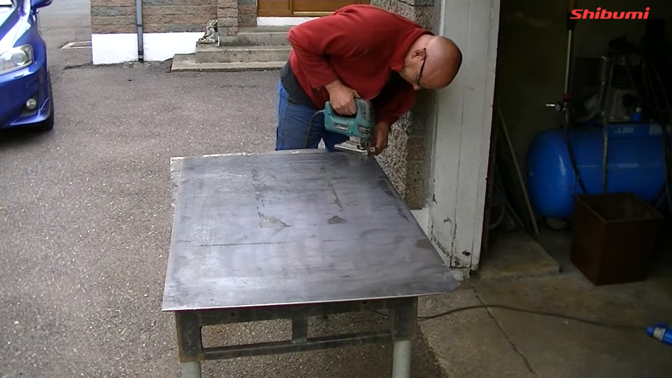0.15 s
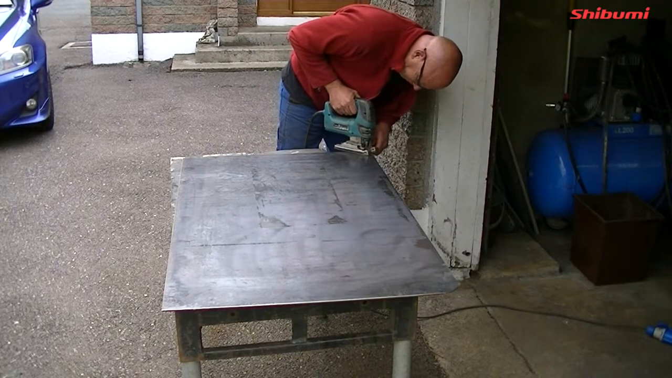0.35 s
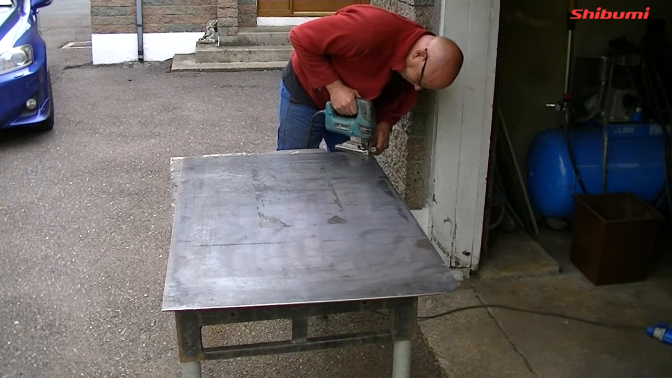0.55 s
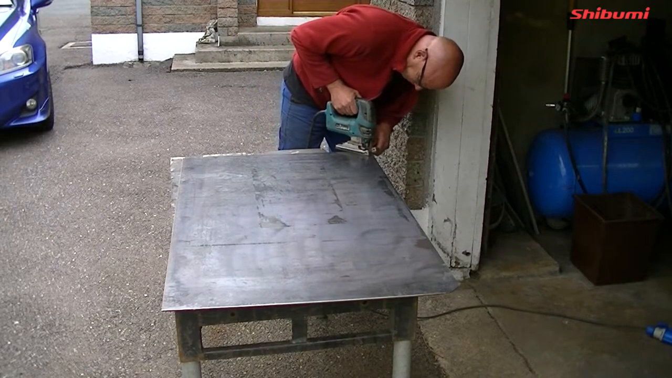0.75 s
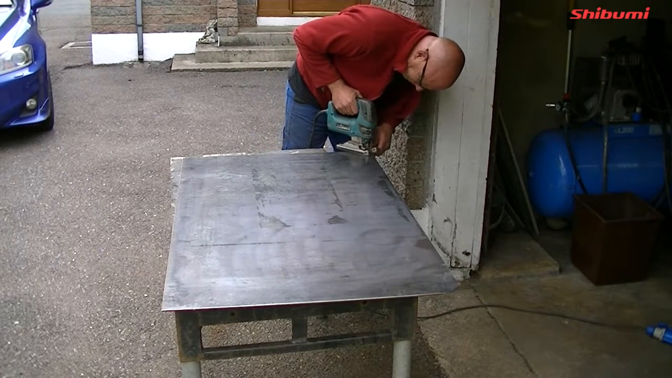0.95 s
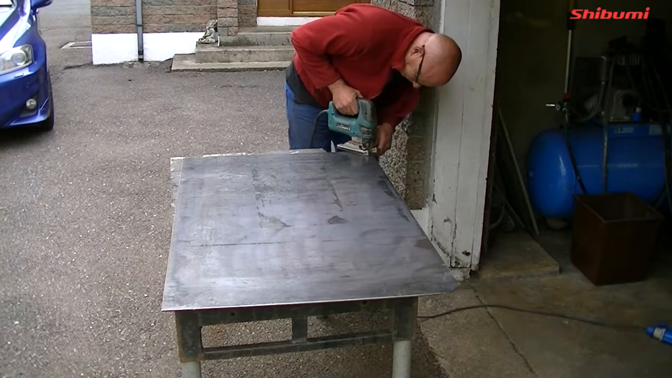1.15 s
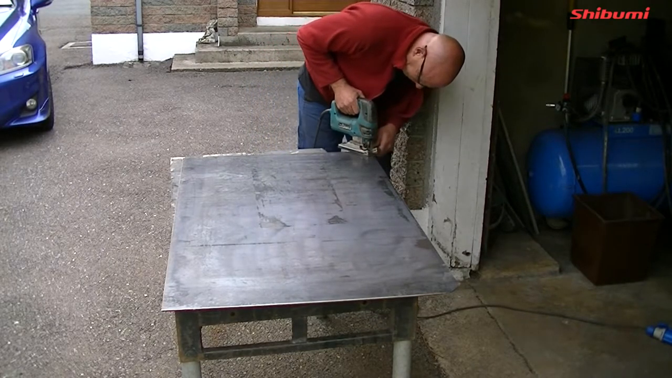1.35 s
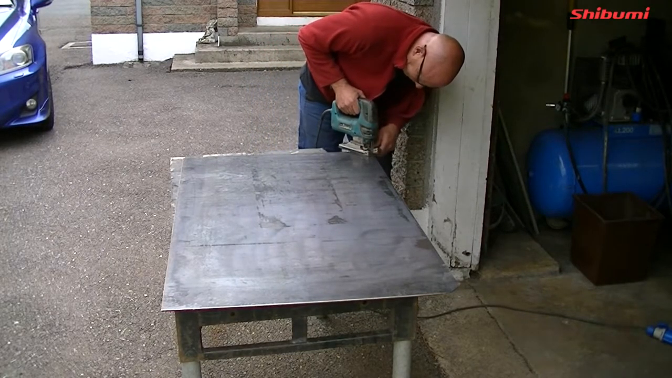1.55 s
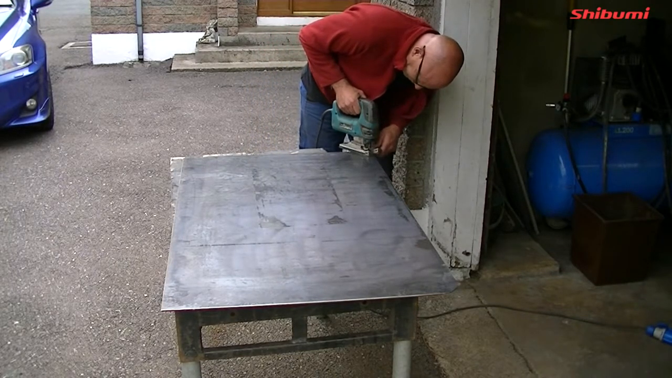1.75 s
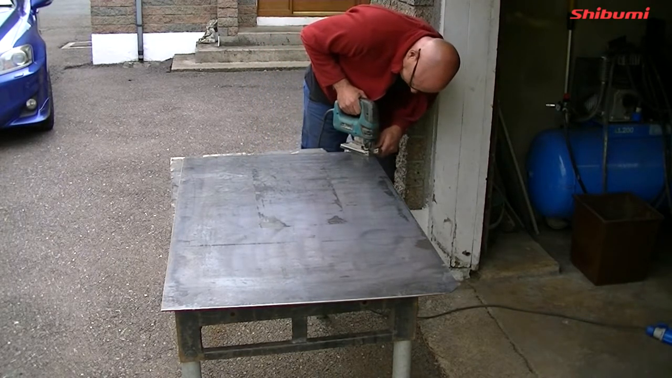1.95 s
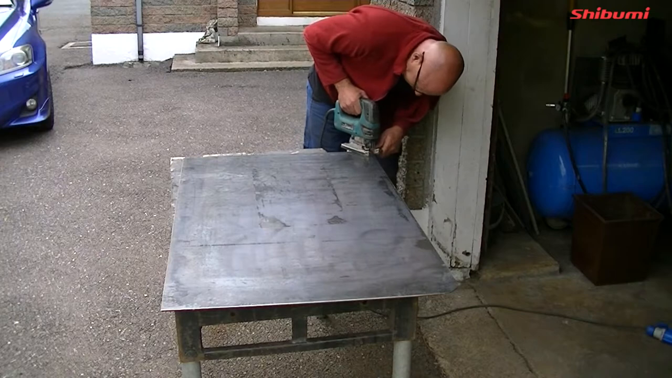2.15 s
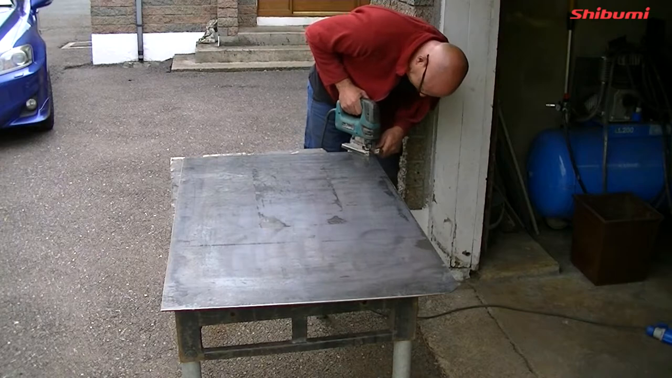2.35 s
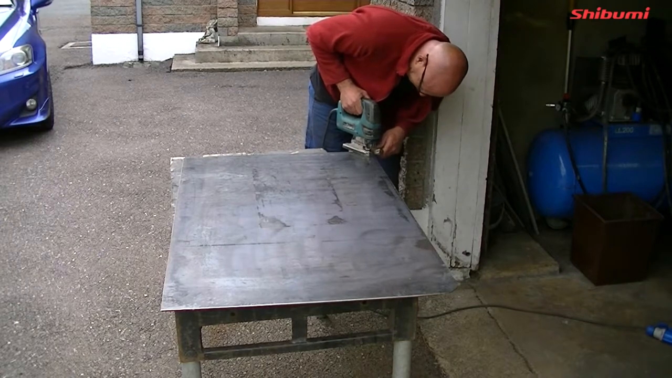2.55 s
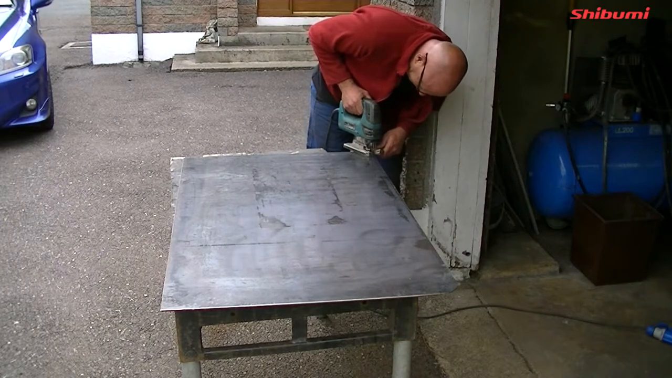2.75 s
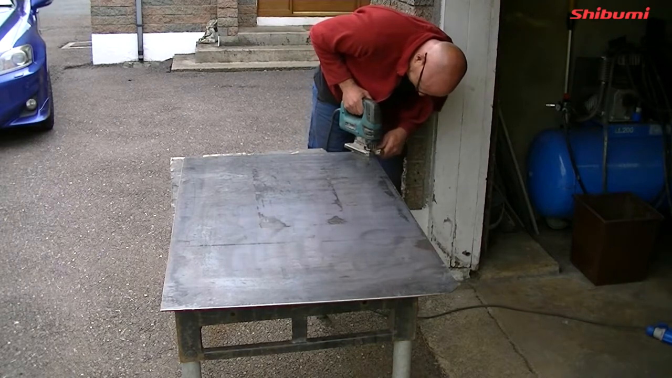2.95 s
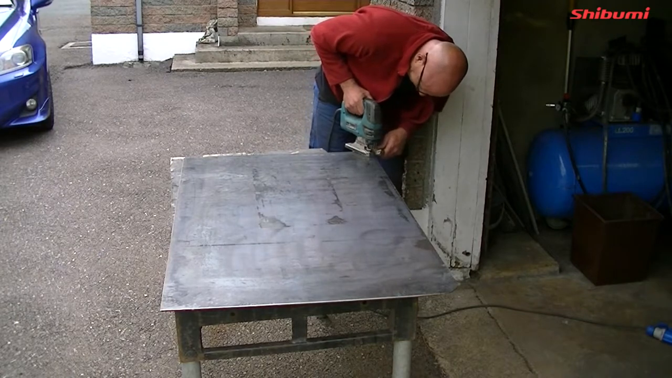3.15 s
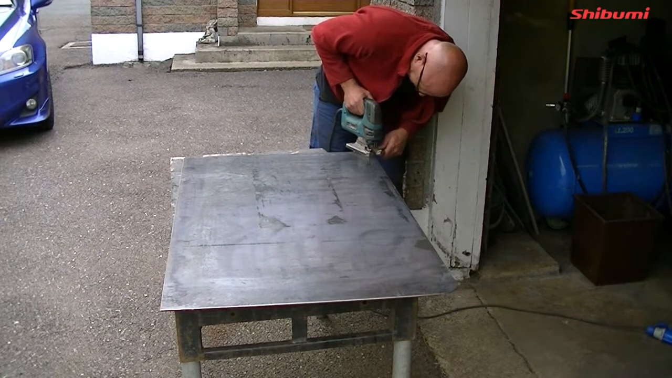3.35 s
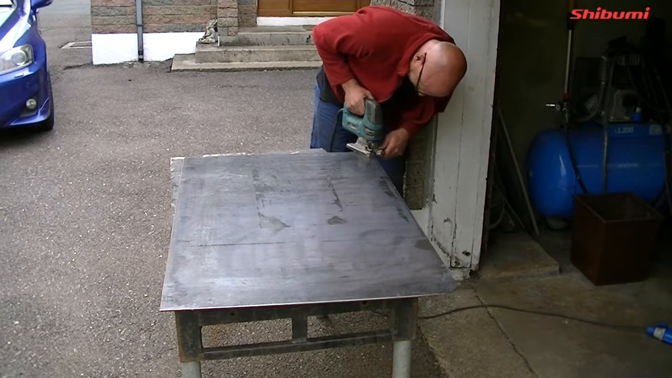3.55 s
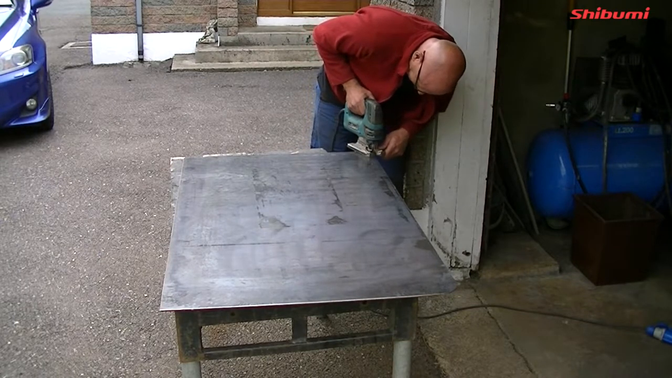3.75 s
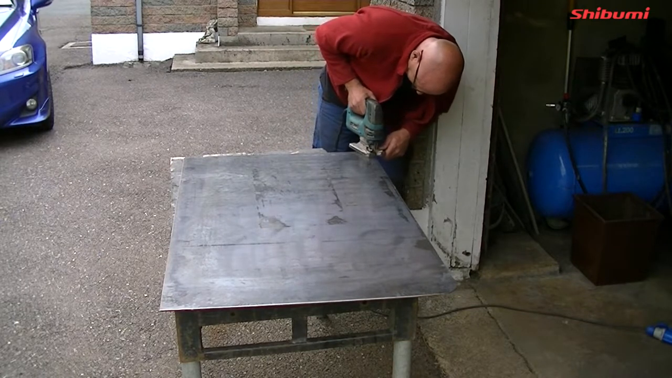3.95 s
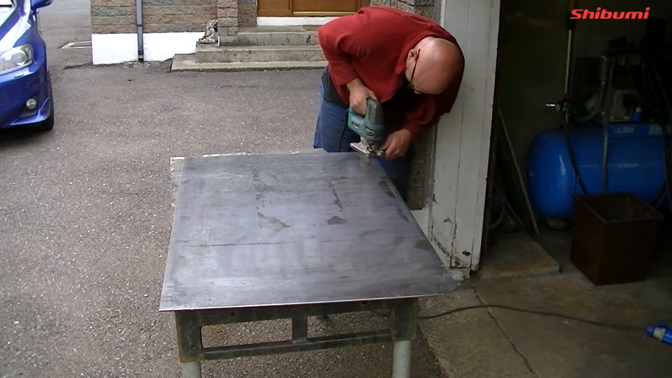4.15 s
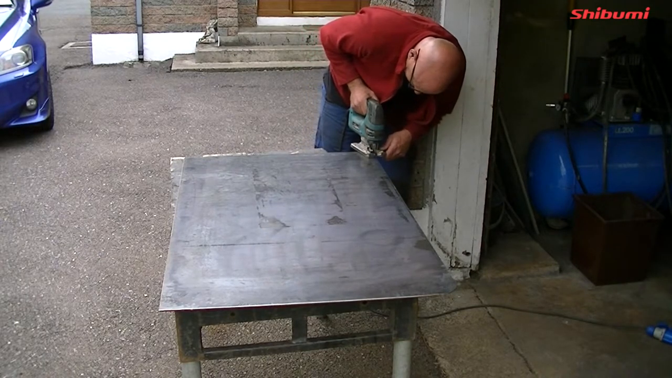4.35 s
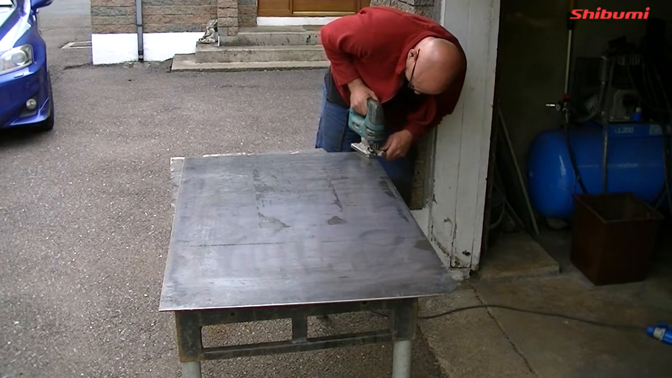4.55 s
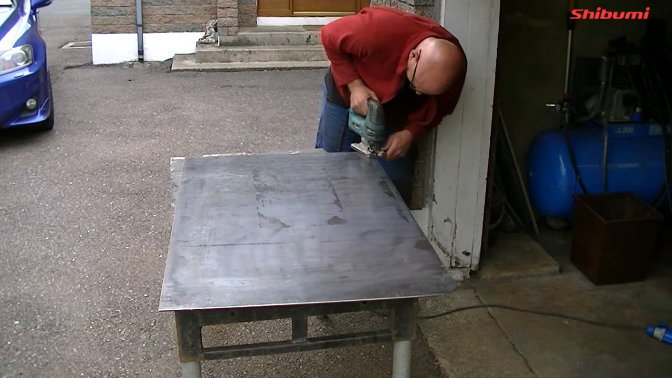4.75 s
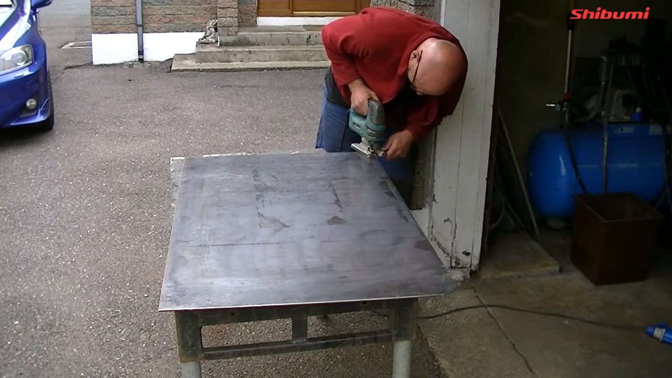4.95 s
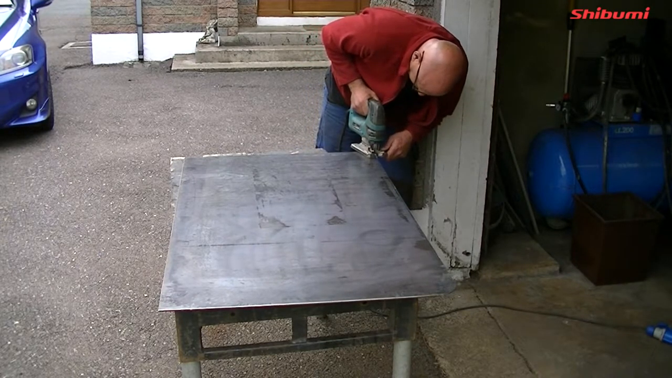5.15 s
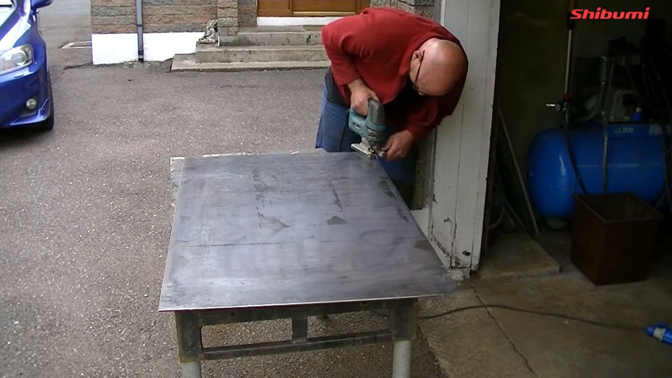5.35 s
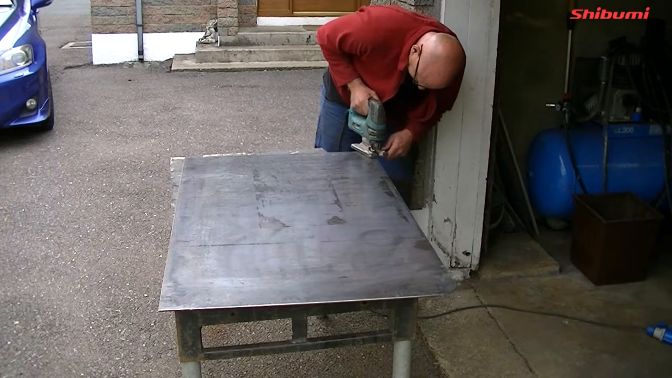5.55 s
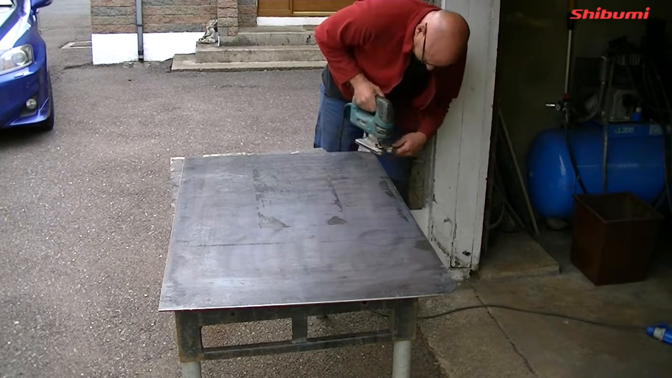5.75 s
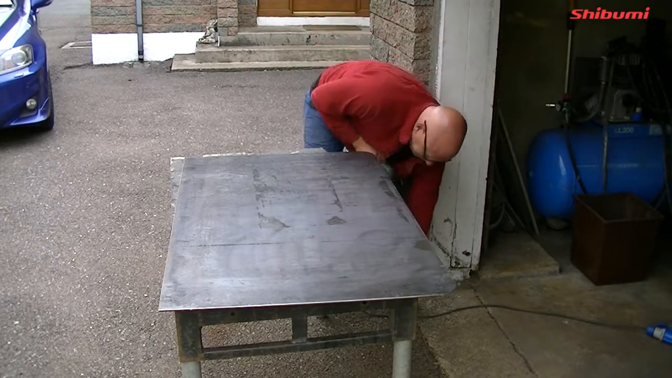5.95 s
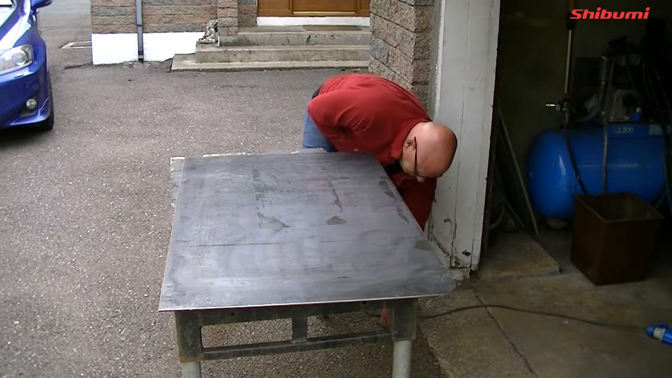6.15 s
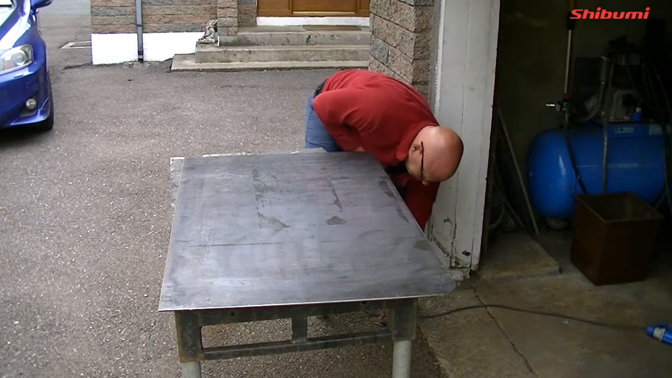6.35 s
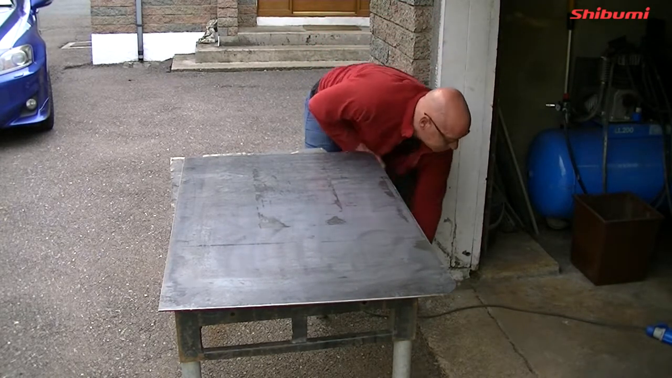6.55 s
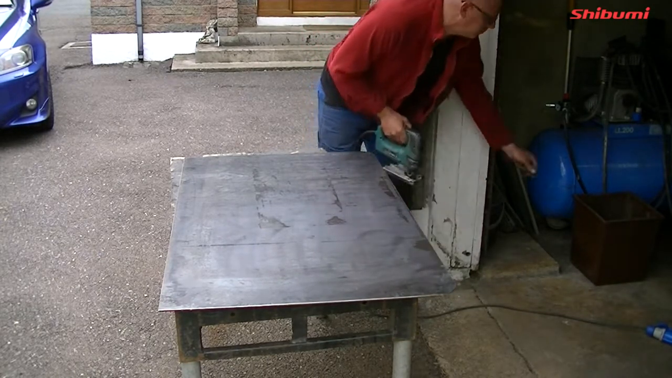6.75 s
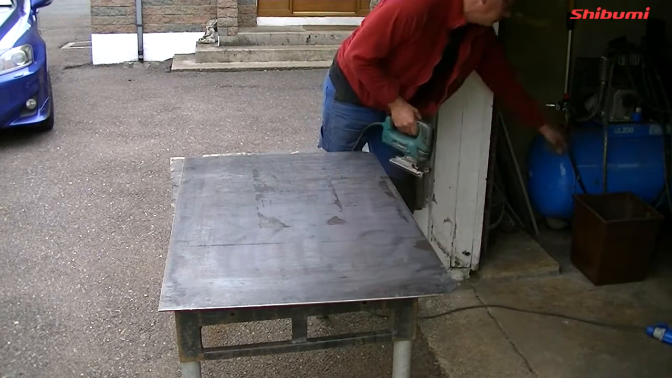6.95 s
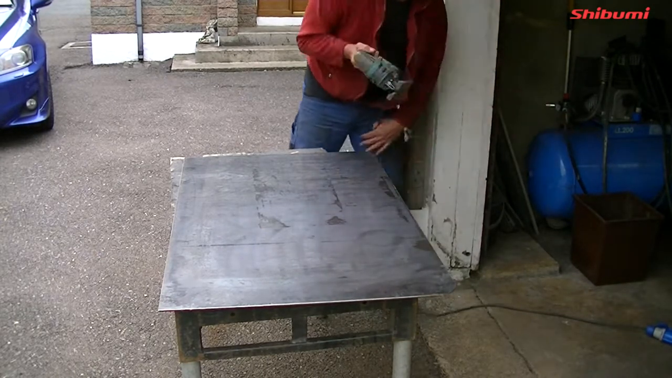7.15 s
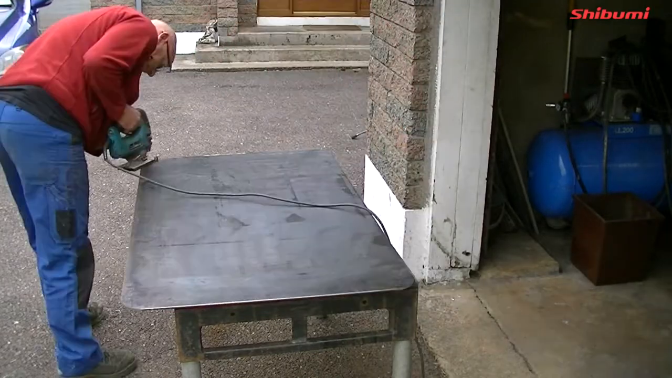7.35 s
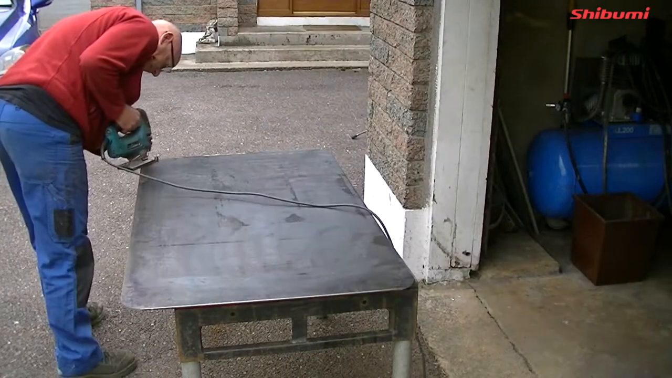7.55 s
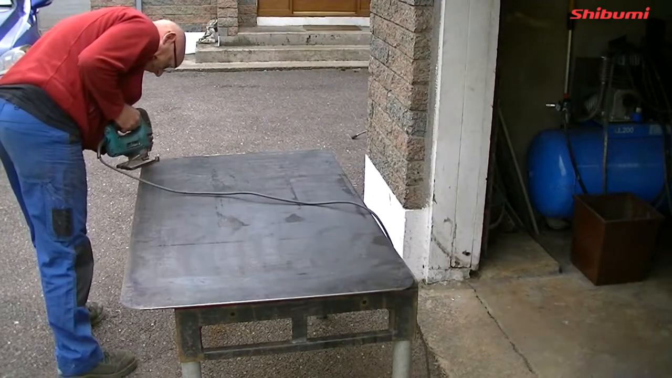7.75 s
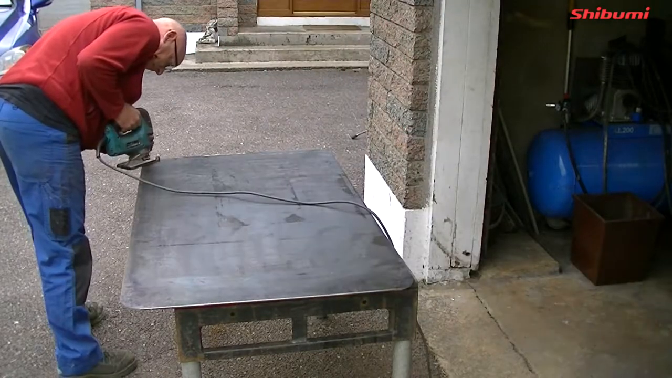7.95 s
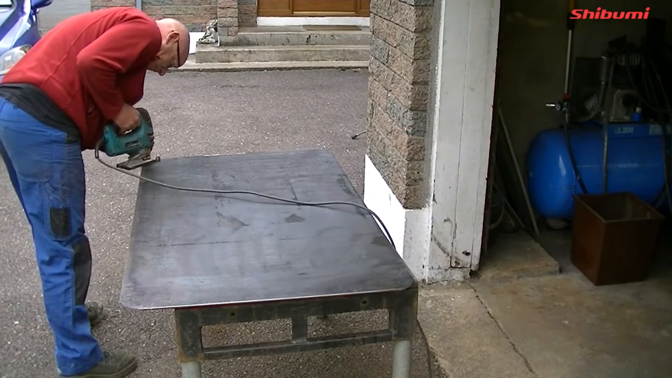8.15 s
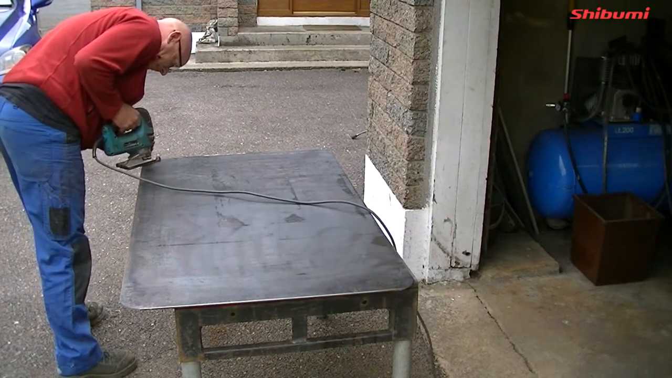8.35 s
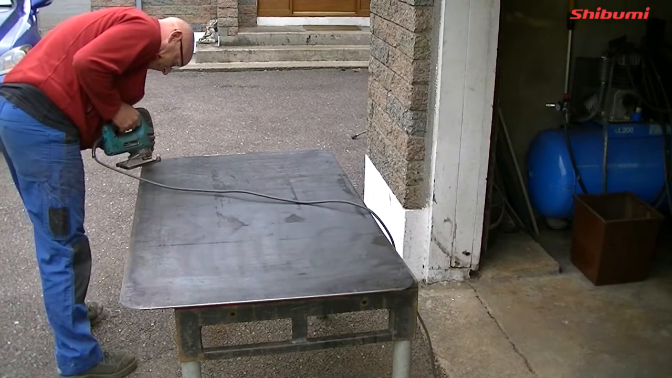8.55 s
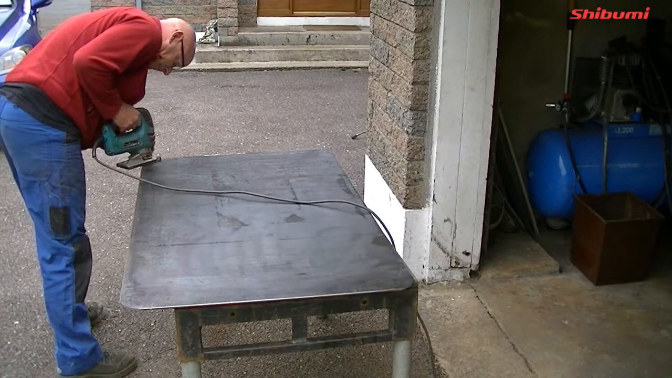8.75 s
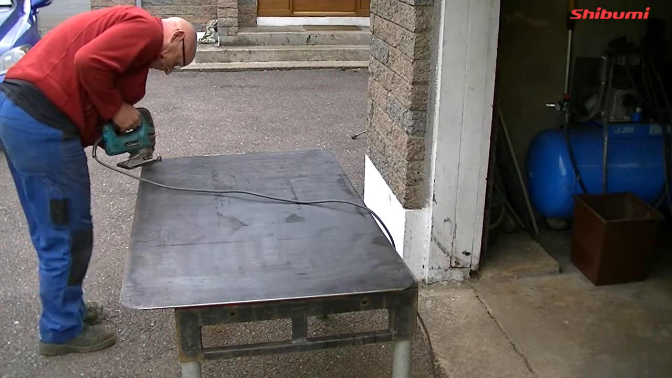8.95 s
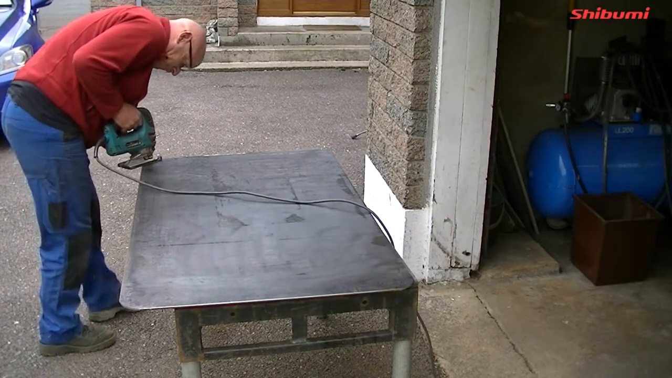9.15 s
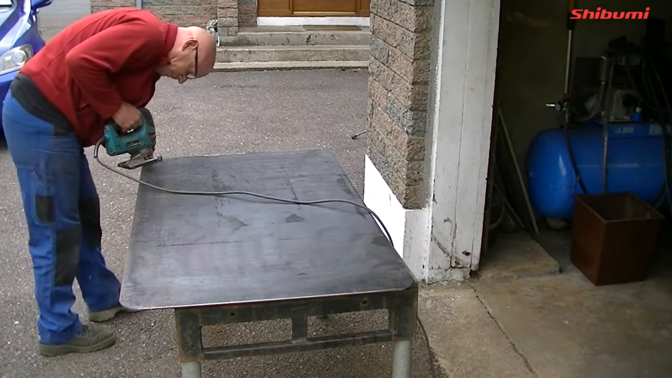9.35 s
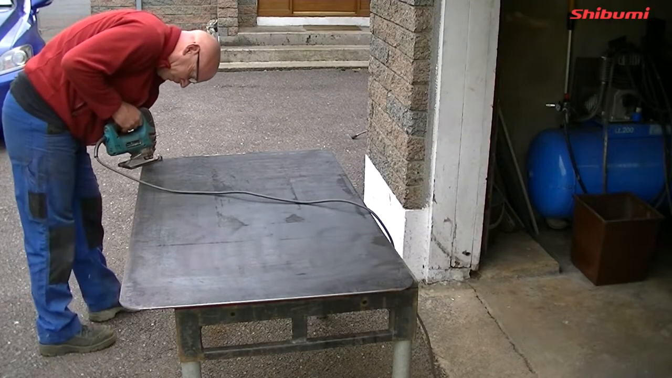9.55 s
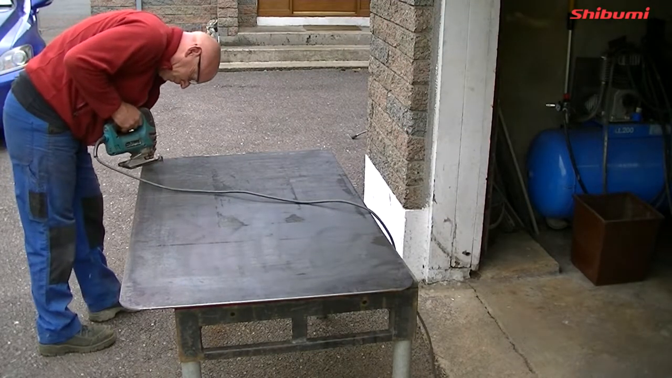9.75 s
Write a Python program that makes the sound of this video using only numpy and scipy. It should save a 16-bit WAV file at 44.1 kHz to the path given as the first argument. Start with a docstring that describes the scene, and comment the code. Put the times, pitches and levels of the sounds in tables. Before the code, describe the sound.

From the start an electric jigsaw is cutting steel plate: a dense, bright rasp pulsing about 74 strokes a second, with hard metallic ringing and steady buzzing tones. Soft wind puffs brush the microphone in the first second. Around 1.4 seconds the blade snags briefly, and the cut grows fuller and more resonant, its ringing swelling and drifting; small wind pops come near 3.5 seconds. A slight shudder at 5.3 precedes the breakthrough at 5.5, when the saw runs free, lighter and slightly faster. From 5.9 it coasts down, its strokes separating and fading by 6.5. Strong gusts flap and pop, heavier on the right, from 6 to 6.7, then scattered puffs over workshop hiss and faint thin tones. A sharp airy spit comes at 7.05. At 7.4 the saw abruptly restarts with a wind thump, rasping and ringing steadily until it cuts off at 9.8.

```python
"""A jigsaw cuts a steel plate on a bench at a workshop door, runs free, coasts down, and cuts again. Each blade
stroke makes two bursts of rasping noise, which ring the plate; steady tones follow the stroke rate. Gusts of
wind pop on the two microphone ports, as puffs of filtered noise and short pressure kicks. Behind them lie a low
hum, and, clearest while the saw rests, filtered hiss, thin tones and sharp bursts of noise."""
import sys
import numpy as np
from scipy import signal
from scipy.fft import rfft, irfft, next_fast_len
from scipy.io import wavfile

SR = 44100
rng = np.random.default_rng(int(sys.argv[2]) if len(sys.argv) > 2 else 0)


def wav_out(sig):
    """Save sig, one row per channel (or a flat mono array), as 16-bit PCM at SR to the path in sys.argv[1]."""
    wavfile.write(sys.argv[1], SR, np.round(np.clip(np.atleast_2d(sig).T, -1, 1) * 32767).astype(np.int16))


N = 432180  # samples in the whole scene

# In tables of spectra, rings and swells the dB are relative: they set shape or balance.
# Tables "per stage" hold four entries: start of the cut, deep in the cut, running free and coasting, second cut.

# Loudness of the saw, per stage: time_s, rasp_db, low_rasp_db (over the rasp), bench_rattle_db (over the rasp),
# main_ring_swell_db, tones_db (added to the tone levels)
STAGE_LEVELS = [
    [(0.0, -19, -12, -22, 1.5, 1), (0.7, -19, -11.5, -16.5, 2.5, -3), (1.0, -17.5, -13.5, -20, -4, 1.5),
     (1.35, -17.5, -12.5, -19, -1, -0.5), (1.45, -18.5, -9.5, -16, -8, 0), (1.75, -17, -15, -19, -16, 1),
     (2.2, -22, -15, -20, 2, 2)],
    [(1.3, -17, -6, -15, -5, 0.0), (1.75, -19, -10, -19.5, 4, -8.5), (2.3, -18.5, -9.5, -18, 8, -3),
     (2.9, -18.5, -8.5, -20, 7, -1), (3.7, -19.5, -6.5, -21.5, 1, -2.5),
     (4.2, -19.5, -6.5, -19.5, 3.5, 0.5), (4.8, -19, -7, -20, 1.5, -3), (5.33, -19.5, -6, -24.5, 5, -4.5),
     (5.462, -19.5, -9.5, -29, 3, -5)],
    [(5.455, -30, -8, -18, -3, 0.0), (5.52, -22, -7.5, -19.5, -15, 0.0), (5.7, -21.5, -12, -21, -5, 0.0),
     (5.9, -22.5, -9.5, -23, 3, 0.0), (6.0, -30, -7.5, -25, 6, 0.0), (6.17, -35.5, -11, -21, 4, 0.0),
     (6.24, -39.5, -8, -9, 4, 0.0), (6.5, -54, -2, -20.5, 10, 0.0)],
    [(7.404, -24.5, -12, -6, 4, 3), (7.43, -23.5, -10.5, -12, -4, -13), (7.56, -21, -11, -15, -6, -14),
     (7.64, -19, -7.5, -15, -3, -6), (7.93, -18.5, -7, -14, -10, -3), (8.02, -19.5, -11, -15.5, -4, -3),
     (8.3, -19, -12, -15.5, -4, 3), (8.6, -20, -12.5, -16.5, 3, -2), (8.78, -18.5, -11.5, -20.5, 5, 2),
     (9.1, -18.5, -11, -20.5, 3, -3), (9.4, -19, -10, -20.5, 3.5, -6), (9.8, -19, -10, -30, 6, 0.5)],
]
# Rasp of teeth, gears and cooling air, one spectrum per stage: pitch_hz, density_db (per Hz)
RASP_SPECTRA = [
    [(120, -64), (200, -32), (366, -21), (424, -24), (601, -31), (659, -15.5), (950, -6.5), (1040, -13),
     (2290, -8.5), (2470, -10), (3560, -7), (4430, -1), (6640, -3.5), (14900, -11), (16000, -32)],
    [(120, -79), (200, -27.5), (294, -23.5), (440, -14.5), (612, -20), (867, -2.5), (1350, -17),
     (2860, -10), (3310, -7.5), (4120, 1), (6520, -6), (9400, 2), (10300, -4), (14900, -10), (16000, -19)],
    [(120, -50), (200, -32), (360, -26), (401, -22), (473, -35), (671, -28), (821, -17), (1000, -24),
     (1560, -16), (1740, -16.5), (6640, -11), (16000, -22)],
    [(120, -62), (200, -38.5), (440, -27.5), (569, -35), (700, -22.5), (900, -15), (1180, -38.5),
     (1370, -11.5), (2650, -7.5), (4770, -9), (5230, -4.5), (6880, -7), (9060, -4.5), (12200, -17),
     (15100, -17.5), (16000, -31)],
]
# Resonances of plate and saw body, per stage: pitch_hz, width_hz (before widening), level_db
PLATE_RINGS = [
    [(4490, 48, -2), (5280, 330, 0.5), (5880, 75, 2.5), (6730, 890, 6.5), (7560, 300, 4.5), (7460, 90, -19),
     (8310, 320, 2.5), (8950, 960, 4), (9960, 250, -13), (10830, 160, 0), (11670, 110, -2),
     (12400, 54, -14), (15200, 140, -21)],
    [(3650, 130, -12.5), (3874, 52, -3.5), (4560, 330, -5.5), (5070, 250, -4.5), (5420, 180, -2),
     (5770, 190, -1.5), (6610, 360, 0), (7510, 670, 0.5), (8340, 250, -2.5), (9120, 117, 0.5),
     (10820, 70, -9), (11420, 83, -7), (13040, 96, -9), (14300, 54, -22)],
    [(3430, 130, 1), (4160, 230, -2), (4920, 770, -1), (5500, 320, 2), (6650, 380, 4.5), (8150, 60, -13),
     (9440, 470, -5), (10200, 180, -5), (13000, 71, -13)],
    [(4370, 640, 2.5), (5220, 250, 9), (5500, 230, -6.5), (5800, 30, 8), (6090, 28, 13), (6550, 180, 9.5),
     (7320, 350, 7), (8130, 230, 11.5), (8880, 210, 8), (10970, 130, 0), (11560, 67, 1), (13300, 180, -16),
     (14900, 150, -18)],
]
# Lower plate resonances, per stage: pitch_hz, width_hz (before widening), level_db
LOW_PLATE_RINGS = [
    [(1572, 7.2, 8), (2050, 150, 5.5), (2490, 47, 10), (2870, 31, 12.5), (3230, 120, 7)],
    [(1550, 7.1, 4.5), (1850, 210, 1), (2282, 18, 12.5), (2600, 84, -6), (3035, 13, 7.5), (3328, 19, 13.5)],
    [],
    [(1190, 220, 13.5), (2248, 240, 14.5), (3110, 240, 16), (3290, 24, 8)],
]
# Tones that every stroke repeats alike, per stage: multiple (of the stroke rate), level_db (rms, before swells)
STROKE_TONES = [
    [(5, -49.7), (7, -59.3), (8, -61.3), (9, -47.0), (10, -50.1), (11, -50.6), (12, -45.5), (13, -51.8),
     (14, -52.9), (16, -49.5), (18, -60.2), (19, -53.2), (20, -50.6), (21, -44), (24, -52.9), (25, -51.0),
     (26, -53.0), (27, -47.1), (28, -48.3), (29, -46.0), (31, -52.7), (33, -41.6), (34, -48.0), (38, -52.6),
     (39, -50.0), (41, -49.3), (43, -52.9), (44, -49.7)],
    [(2, -74.6), (3, -60.3), (5, -58.4), (6, -52.2), (7, -60.2), (8, -62.6), (9, -48.5), (10, -55.4),
     (11, -52.9), (12, -50), (13, -50.6), (16, -49.3), (17, -51.4), (18, -55.1), (19, -52.0), (21, -47.1),
     (23, -46.8), (24, -45.8), (26, -50.5), (30, -47.5), (31, -38.5), (32, -47.8), (33, -46.2), (35, -43.8),
     (36, -46.6), (41, -36.7), (42, -41.7), (44, -43.6), (45, -36.2), (47, -47.6), (50, -49.8), (52, -47.5)],
    [],
    [(2, -72.7), (5, -60.5), (6, -55.9), (9, -54.9), (10, -51.1), (11, -51.5), (12, -48.5), (13, -49.6),
     (14, -59.3), (15, -56.2), (16, -55.8), (17, -58.4), (18, -47.7), (19, -51.3), (20, -54.6), (21, -55.2),
     (22, -54.8), (23, -58.2), (24, -57.7), (31, -51.3), (32, -52.1), (33, -55.4), (40, -55.2), (41, -51.5),
     (43, -53.6), (50, -53.7)],
]
# Fades of the saw, per stage: fade_in_s, fade_out_s
STAGE_FADES = [(0, .9), (.9, .006), (.006, .05), (.002, 0)]
# Part that the ringing plate plays in the bright sound, per stage: share (0-1)
PLATE_SHARES = [0.75, 0.73, 0.43, 0.51]
# The resonance nearest this pitch follows main_ring_swell_db, per stage: pitch_hz
MAIN_RING_PITCHES = [6620, 6620, 5000, 5200]
# Where the crank stands at the start, before bite_shift_turns, per stage: position_turns
CRANK_STARTS = [.62, .64, .55, .96]
# Steady rush of air under KNOCK_HZ, added to the bursts, per stage: amount (gain)
AIR_AMOUNTS = [1.6, 1.0, 1.0, .9]
# Speed of the crank: time_s, speed_strokes_per_s
CRANK_SPEED = [(0.0, 74.65), (0.95, 74.63), (2.15, 74.22), (2.55, 74.37), (3.75, 74.45), (4.95, 74.32),
               (5.4, 74.7), (5.52, 75.9), (5.9, 76.0), (6.0, 63), (6.116, 45), (6.184, 43.2), (6.278, 41),
               (6.29, 32.5), (6.5, 28), (7.4, 74.0), (7.65, 73.26), (8.25, 73.75), (8.55, 74.6),
               (9.15, 74.3), (9.45, 74.84), (9.8, 74.84)]
# Shape of a stroke as the cut goes on: time_s, down_drag (strength, before wander), drag_lag_turns (behind the
# bite), knock (extra gain at the bite), bite_shift_turns (how much later in the turn the bite falls)
STROKE_SHAPE = [(0, .4, .36, .5, -.08), (1.42, .4, .36, .5, .02), (1.47, .35, .55, .4, .1),
                (2.8, .45, .55, .4, .09), (3.6, .95, .56, .4, .07), (5.0, .95, .55, .4, .08),
                (5.4, .8, .5, .4, .18), (5.5, .7, .43, .4, 0), (6.5, .7, .43, .4, 0),
                (7.4, .45, .4, .5, .15), (8.4, .65, .36, .2, .02), (9.0, .7, .36, .15, .01),
                (9.8, .65, .36, .2, .08)]
# The blade snags and the plate shudders: time_s, length_s (to 1/e on each side), low_rasp_up_db,
# bench_rattle_up_db, high_rasp_up_db, broad_scrape_db
BLADE_SNAGS = [(1.435, 0.035, 2.2, 3.6, 1.8, -30), (4.096, 0.036, 1, 2.5, 0, -39),
               (5.325, 0.015, 0, 8.1, 0, -49)]
# Broad rasp of a snag, as a spectrum: pitch_hz, density_db (per Hz)
SCRAPE_SPECTRUM = [(500, -12), (800, -31), (1500, 6), (2500, 5), (4500, 4), (7000, -35)]
# Resonances that swell and fade as the cut moves along the plate: pitch_hz
SWELL_PITCHES = [2300, 2480, 3050, 3330, 4180, 8200, 9000]
# Their swells, before a random drift: time_s, then one swell_db for each of SWELL_PITCHES
SWELL_CURVES = [(0, 1, -4, -8, 0, 0, 7, 2.5), (.6, 8, 4, -7, 0, 0, 3, -6),
                (1.2, 5, 0, 12.5, 0, -1, -5, -2.5), (1.9, -4, 7, 6.5, 0.41, 0, 7, 2),
                (2.6, -9, 3, 7, 1, 0, 4, -4), (3.2, 3, 6, 6, 1, 0, 1, -1), (3.7, -4, -5, 2.5, 0, 0, 2, 4.5),
                (4.05, 8, -1, -1, -0.38, 0, 2, 4.5), (4.4, -4, -9, -1, 0.56, 0, 1, 5),
                (5.0, 5, -9, 2, 0.52, 0, 2, 2), (5.4, -13, -7, -11, -2, -6, -5, 1),
                (5.75, 0, 0, 0, 0, -8, 0, 0), (5.83, 0, 0, 0, 0, 10, 0, 0), (7.4, 1, 0, -5, 0, 2, -7, 0),
                (8.0, 0, -2, -6, 0, 0, 0, 5), (8.5, 1, -2, 6, 0, 0, 3, 7.5), (8.9, -3, -7, 1, 0, 0, 0, -2),
                (9.8, -4, 0, -5, -2, 0, 4, 4)]
# Puffs of wind on the ports: time_s (centre), length_s (scales the puff), left_db, right_db
WIND_GUSTS = [(0.184, 0.019, -62, -32), (0.283, 0.049, -43, -35), (0.356, 0.03, -32, -26),
              (0.49, 0.087, -37, -34), (0.638, 0.019, -34, -37), (0.758, 0.076, -28, -26.5),
              (0.894, 0.037, -49, -40), (1.75, 0.057, -44, -32.5), (1.982, 0.055, -36, -29.5),
              (2.683, 0.045, -37, -36), (3.369, 0.02, -40, -31), (3.413, .04, -38, -33),
              (3.468, 0.041, -34, -27.5), (3.552, 0.075, -32, -31.5), (5.07, 0.12, -50, -63),
              (5.847, 0.091, -42, -38), (5.983, 0.11, -31, -21), (6.068, 0.043, -26, -17.5),
              (6.125, 0.028, -29, -16.5), (6.178, 0.036, -26, -16.5), (6.222, 0.012, -22, -15),
              (6.29, 0.11, -25, -16.5), (6.372, 0.037, -26, -23), (6.45, 0.079, -22, -16.5),
              (6.517, 0.024, -26, -23), (6.6, 0.028, -24.5, -19), (6.735, 0.045, -35, -23.5),
              (6.794, 0.014, -27, -29), (6.885, 0.025, -26, -24.5), (6.975, 0.015, -33, -26),
              (7.017, 0.025, -32, -25), (7.11, 0.083, -31, -32), (7.175, 0.012, -28, -21),
              (7.188, 0.0055, -26, -24), (7.221, 0.021, -24.5, -24), (7.43, 0.024, -24, -16.5),
              (7.495, 0.038, -29, -23.5), (7.532, 0.015, -30, -23.5), (7.565, 0.059, -34, -25.5),
              (8.143, 0.18, -60, -48), (8.465, 0.097, -56, -35), (9.304, 0.047, -44, -40),
              (9.5, 0.048, -45, -39)]
# Noise of a strong gust, as a spectrum: pitch_hz, density_db (per Hz)
WIND_SPECTRUM = [(24, -73), (40, -36.5), (200, -6), (275, 0.5), (506, 4), (815, -3.5), (1300, -11),
                 (2020, -28), (5990, -70), (7180, -76), (7680, -97), (9000, -100), (11700, -130),
                 (19800, -120)]
# The sharpest wind pops: time_s, kick_db (peak, before the bass cuts), bright_edge_db, port (0 left, 1 right)
WIND_POPS = [(.7545, -16, -36, 0), (2.652, -14, -34, 0), (3.372, -17, -36, 1), (3.459, -16, -36, 1),
             (3.478, -15, -35, 1), (3.536, -18, -38, 0), (3.564, -16, -36, 0), (4.914, -27, -45, 0),
             (5.052, -24, -42, 0), (5.099, -21, -40, 1), (5.921, -16, -26, 1), (6.1043, -13, -27, 1),
             (6.1646, -6, -17, 1), (6.193, -11, -17, 1), (6.1973, -13, -26, 0), (6.1984, -9, -20, 1),
             (6.2205, -6, -18, 1), (6.2245, -7, -19, 1), (6.2378, -4, -16, 1), (6.249, -10, -19, 1),
             (6.2642, -10, -20, 1), (6.279, -11, -20, 1), (6.3125, -8, -16, 1), (6.3155, -9, -17, 1),
             (6.3545, -9, -19, 1), (6.368, -11, -21, 1), (6.3877, -10, -20, 0), (6.4045, -10, -18, 1),
             (6.4112, -6, -18, 1), (6.4285, -10, -19, 1), (6.4522, -6, -16, 1), (6.467, -9, -17, 1),
             (6.4705, -10, -18, 1), (6.4861, -10, -21, 1), (6.5969, -7, -24, 1), (6.717, -12, -30, 1),
             (7.1765, -16, -32, 0), (7.4188, -11, -26, 1), (7.505, -17, -32, 1)]
# Bright edge of a pop, as a spectrum: pitch_hz, density_db (per Hz)
CRACK_SPECTRUM = [(600, -25), (1100, 0), (2200, -8), (4500, -23), (7000, -45)]
# Workshop hiss, as a spectrum: pitch_hz, density_db (per Hz)
HISS_SPECTRUM = [(59, -42), (100, -9), (718, 3), (1110, 3.5), (1290, -1), (1700, 1.5), (2230, 3.5),
                 (3800, 3), (4300, -3), (5100, -3), (5700, -2), (6300, -9), (15000, -24.5)]
# Loudness of the hiss, before a small random drift: time_s, level_db (rms)
HISS_LOUDNESS = [(5.9, -49), (6.1, -40), (6.45, -45), (6.55, -34), (6.6, -38), (6.66, -34.5), (7.0, -33.5),
                 (7.39, -33), (7.42, -41)]
# Thin fading tones in the pause: start_s, length_s, pitch_hz (wavers), level_db (rms, before drift and fades)
THIN_TONES = [(6.555, .05, 1840, -35), (6.62, .055, 1870, -40), (6.68, .04, 1863, -42),
              (6.58, .13, 1550, -46), (6.8, .25, 1281, -45), (6.91, .04, 1720, -42), (6.97, .1, 955, -45),
              (7.075, .042, 603, -31), (7.08, .06, 790, -39), (7.203, .033, 334, -32),
              (7.13, .24, 1281, -44), (7.26, .09, 5780, -46), (6.67, .1, 5700, -50), (6.71, .05, 5150, -48),
              (6.78, .07, 5750, -48), (6.5, .04, 3600, -45), (6.84, .07, 3800, -46)]
# A sharp burst of noise, as a spectrum: pitch_hz, density_db (per Hz)
SHARP_NOISE_SPECTRUM = [(290, -41), (500, -25), (800, -10), (1140, -16), (2040, -8), (2190, -15), (3440, -9),
                        (5240, -6.5), (5970, -1), (7210, -17), (9090, -9), (12100, -15), (13800, -3.5),
                        (16000, -18)]
# When the sharp bursts come: start_s, level_db (rms, after the sharp start), fade_s (to fall 60 dB)
SHARP_NOISE_TIMES = [(7.0516, -20.5, 0.21), (7.152, -54, .15)]
# Loudness of the low wavering hum: time_s, level_db (rms)
HUM_LOUDNESS = [(0, -62), (.85, -58), (1.6, -58), (2.3, -73.5), (7.4, -81), (8.1, -57), (8.5, -59),
                (8.85, -59.5), (9.5, -64)]

HUM_HZ, HUM_WIDTH_HZ = 161.1, 7.5
BENCH_HZ, SPLIT_HZ = 1200, 3500  # bench rattle below the first, low rasp between, high rasp above
KNOCK_HZ = 6000  # above it the bite starts with a sharp knock
KNOCK_SHARP = 46  # narrowness of the knock
CATCH, CATCH_TURNS = .8, .05  # a strong down-stroke catches with a snap: strength, decay in turns
BITE_SHARP, DRAG_SHARP, BETWEEN = 2.0, 2.6, .42  # narrowness of the two bursts, rasp left between them
DOWN_WANDER, WANDER_PER_S = 0.2, 4.5  # slow wander of the drag
SLACK_TURNS, SLACK_PER_S = .004, 30  # play in the crank: strokes land a little early or late
COAST_BELOW, COAST_GAPS = 57, 0.48  # under this many strokes per s the gaps grow quieter, up to this power
TONE_SCATTER = .6  # the tones start together at the bite, within this part of a cycle
PATTERN_STEPS = 592  # steps of tooth noise in one turn
LUMPS_DB, LUMPS_PER_S = 1, 25  # a long gust breaks up into lumps
WIND_CUT_HZ, CRACK_S = 73, .002  # bass cut of the wind, decay of a pop's bright edge
EDGE_HZ = 16050  # upper band limit


def gain_of(db):
    """Turns dB into gain."""
    return 10 ** (np.asarray(db) / 20)


def evened(x):
    """Scales a sound to rms 1."""
    return x / np.sqrt(np.mean(x ** 2) + 1e-20)


def add(mix, s, sound):
    """Mixes a sound in at s seconds."""
    part = mix[round(s * SR):][:len(sound)]
    part += sound[:len(part)]


def curve(t, rows):
    """Reads every column of a timed table at the times t, along straight lines."""
    s, *columns = np.transpose(rows)
    return [np.interp(t, s, column) for column in columns]


def high_pass(x, order, hz):
    """Takes away what lies below hz."""
    return signal.sosfilt(signal.butter(order, hz, "high", fs=SR, output="sos"), x)


def coloured(x, points, lo_hz=0, hi_hz=SR):
    """Filters x by a spectrum, between two edges, to rms 1."""
    size = next_fast_len(len(x))
    hz = np.fft.rfftfreq(size, 1 / SR)
    f, db = np.transpose(points)
    shape = gain_of(np.interp(np.log(hz + 1), np.log(f + 1), db))
    shape = shape * (hz >= lo_hz) * (hz < hi_hz)
    return evened(irfft(rfft(x, size) * shape, size)[:len(x)])


def drift(size, per_s):
    """Slow chance: random knots joined by lines."""
    at = np.arange(size) * min(per_s, 400) / SR
    knots = rng.standard_normal(size // 100 + 2)
    return np.interp(at, np.arange(len(knots)), knots)


def ring(x, hz, width):
    """One fixed resonance, rms 1: a narrower one rings longer."""
    r = np.exp(-np.pi * width / SR)
    return evened(signal.lfilter([1, 0, -1], [1, -2 * r * np.cos(2 * np.pi * hz / SR), r * r], x))


def hum():
    """A narrow band of low noise, so its level wavers."""
    band = ring(rng.standard_normal(N), HUM_HZ, HUM_WIDTH_HZ)
    band = ring(band, HUM_HZ, 3.9 * HUM_WIDTH_HZ)
    level_db, = curve(np.arange(N) / SR, HUM_LOUDNESS)
    return gain_of(level_db) * band


def pause():
    """Filtered hiss, thin wavering tones and sharp bursts of noise, clearest while the saw rests."""
    hiss_db, = curve(np.arange(N) / SR, HISS_LOUDNESS)
    out = gain_of(hiss_db + 0.14 * drift(N, 36)) * coloured(rng.standard_normal(N), HISS_SPECTRUM)
    for s, length, hz, db in THIN_TONES:
        size = round(length * SR)
        tone = np.sin(2 * np.pi * hz * np.arange(size) / SR + .8 * drift(size, 60))
        level = gain_of(db + 1.5 * drift(size, 30)) * np.sqrt(2)
        add(out, s, level * tone * signal.windows.tukey(size, .4))
    t = np.arange(SR // 4) / SR
    for s, db, t60 in SHARP_NOISE_TIMES:
        sharp_start = 1 + 1.3 * np.exp(-t / .0012)
        held = gain_of(db - 60 * np.maximum(t - .03, 0) / t60)  # steady for 0.03 s, then fades
        add(out, s, sharp_start * held * coloured(rng.standard_normal(len(t)), SHARP_NOISE_SPECTRUM))
    return out


def gusts():
    """Puffs of turbulence, with unrelated noise at the two ports; weak puffs are duller."""
    t, power = np.arange(N) / SR, np.zeros((2, N))
    for s, length, left_db, right_db in WIND_GUSTS:
        near = slice(max(round((s - 2 * length) * SR), 0), round((s + 2 * length) * SR))
        puff = np.exp(-((t[near] - s) / (0.66 * length)) ** 2) ** 1.42
        power[:, near] += gain_of([[left_db], [right_db]]) ** 2 * puff
    out = []
    for level in np.sqrt(power) * gain_of(LUMPS_DB * drift(N, LUMPS_PER_S)):
        flutter_db = 1.2 * drift(N, 60) + 1.5 * drift(N, 150) + 3.2 * drift(N, 350)
        bright = coloured(gain_of(flutter_db) * rng.standard_normal(N), WIND_SPECTRUM)
        dull = evened(signal.lfilter(*signal.butter(1, 250, fs=SR), bright))
        strong = np.clip(level / gain_of(-23.5), 0, 1) ** 3.2
        out.append(level * (strong * bright + (1 - strong) * dull))
    return out


def add_pops(ports):
    """Adds short pressure kicks, higher and quicker when strong, each with a bright noisy edge."""
    u = np.arange(-100, 600) / SR
    edges = coloured(rng.standard_normal(len(WIND_POPS) * len(u)), CRACK_SPECTRUM)
    for (s, db, edge_db, port), fizz in zip(WIND_POPS, edges.reshape(len(WIND_POPS), -1)):
        swing = np.cos(2 * np.pi * (900 + 25 * db) * u)
        kick = swing * np.exp(np.where(u < 0, u / .0005, u * (db + 40) * -16))
        crack = gain_of(edge_db) * fizz * np.exp(-np.abs(u) / np.where(u < 0, .0004, CRACK_S))
        add(ports[int(port)], s + u[0], rng.choice([-1, 1]) * gain_of(db) * kick + crack)


def wind():
    """Gusts and pops together at the two ports, with the deepest bass cut away."""
    ports = gusts()
    add_pops(ports)
    return high_pass(ports, 2, WIND_CUT_HZ)


def swell_db(hz, t):
    """The swell curve of a resonance; slow chance for those without one."""
    off = np.abs(np.array(SWELL_PITCHES) / hz - 1)
    if off.min() > .03:
        return 1.3 * drift(len(t), 4)
    return curve(t, SWELL_CURVES)[off.argmin()] + 1.4 * drift(len(t), 6.17)


def worn_teeth(turns, count):
    """Noise repeated each stroke and renewed over count strokes: the same teeth meet the same edge."""
    patterns = rng.standard_normal((int(turns.max()) + 2, PATTERN_STEPS))
    age = turns / count
    row, place = age.astype(int), (turns % 1 * PATTERN_STEPS).astype(int)
    blend = age % 1 * np.pi / 2
    return np.cos(blend) * patterns[row, place] + np.sin(blend) * patterns[row + 1, place]


def burst(angle, sharp):
    """A smooth bump once a turn, narrower when sharp is large."""
    return np.exp(sharp * (np.cos(angle) - 1))


def low_gongs(body, low_rings, t):
    """The lower plate resonances, driven by the body of the rasp."""
    gongs = 0
    for hz, width, db in low_rings:
        wide = width + 40
        level = gain_of(db + swell_db(hz, t)) * np.sqrt(wide)
        gongs = gongs + level * ring(ring(body, hz, wide), hz, 4 * width + 150)
    return gongs


def ringing_plate(knocked, smooth, rings, main_hz, main_db, t):
    """Upper resonances: those above KNOCK_HZ are struck by the knocks, the rest by the smooth rasp."""
    main = np.argmin([abs(hz - main_hz) for hz, _, _ in rings])
    weights = [gain_of(db) * np.sqrt(width) for _, width, db in rings]
    plate = 0
    for k, (hz, width, _) in enumerate(rings):
        swell = main_db if k == main else swell_db(hz, t)
        drive = knocked if hz > KNOCK_HZ else smooth
        plate = plate + weights[k] * gain_of(swell) * ring(ring(drive, hz, width + 90), hz, 4 * width + 300)
    return plate / np.linalg.norm(weights)


def stroke_tones(tones, turns, speed, t):
    """Steady tones at whole multiples of the crank's turning, so they follow its speed."""
    total = 0
    for k, db in tones:
        level = gain_of(db + swell_db(k * speed.mean(), t)) * np.sqrt(2)
        total = total + level * np.cos(2 * np.pi * (round(k) * turns + TONE_SCATTER * rng.random()))
    return total


def saw(rows, start_turns, mid_air, fades, rasp, rings, low_rings, share, main_hz, tones):
    """Teeth bite on the up-stroke and drag on the down-stroke; the bursts ring the plate."""
    t = np.arange(rows[0][0], rows[-1][0], 1 / SR)
    size = len(t)
    rasp_db, low_db, bench_db, main_db, tones_db = curve(t, rows)

    high_db, scrape, broad = np.zeros((3, size))
    for at, length, low_up_db, bench_up_db, high_up_db, broad_db in BLADE_SNAGS:
        snag = np.exp(-((t - at) / length) ** 2)
        low_db = low_db + low_up_db * snag
        bench_db = bench_db + bench_up_db * snag
        high_db = high_db + high_up_db * snag
        scrape = scrape + 1.3 * snag
        broad = broad + gain_of(broad_db) * snag

    # the crank turns the blade up and down
    down, lag, knock, bite_shift = curve(t, STROKE_SHAPE)
    down = np.clip(down + DOWN_WANDER * drift(size, WANDER_PER_S), 0, 1.2)
    speed, = curve(t, CRANK_SPEED)
    turns = start_turns - bite_shift + np.cumsum(speed) / SR + SLACK_TURNS * drift(size, SLACK_PER_S)
    angle = 2 * np.pi * (turns + 0.0099 * drift(size, 70))
    up_bite = burst(angle, BITE_SHARP)
    down_drag = burst(angle - 2 * np.pi * lag, DRAG_SHARP)
    strokes = BETWEEN + gain_of(1.0 * drift(size, 60)) * (up_bite + down * down_drag)

    # noise of the teeth, with sharp knocks and catches, and a rush of air
    worn = worn_teeth(np.abs(turns), count=25)
    bursts = strokes * gain_of(0.55 * drift(size, 350))
    teeth = evened(bursts * (rng.standard_normal(size) + 0.68 * worn))
    catch = down ** 2 * np.exp(-((turns - lag + .05) % 1) / CATCH_TURNS) * CATCH
    knocked = evened(teeth * (1 + knock * burst(angle, KNOCK_SHARP) + catch))
    air = rng.standard_normal(size)
    smooth = evened(teeth + mid_air * air)
    upper = high_pass(evened(knocked + .5 * air) - smooth, 2, KNOCK_HZ)  # swaps in the knocks high up
    high = coloured(smooth + upper, rasp, lo_hz=SPLIT_HZ) * gain_of(high_db + 0.23 * drift(size, 9.4))

    # lower down, strokes repeat more alike
    body = evened(bursts * (worn + 1.25 * air)) + 0.5 * rng.standard_normal(size)
    gongs = evened(low_gongs(body, low_rings, t))
    low = gain_of(low_db) * evened(coloured(body, rasp, BENCH_HZ, SPLIT_HZ) + .35 * gongs)
    rattle = body + 0.5 * worn + (0.34 + scrape) * air
    bench = gain_of(bench_db) * coloured(rattle, rasp, hi_hz=BENCH_HZ)

    plate = ringing_plate(knocked, smooth, rings, main_hz, main_db, t)
    bright = np.sqrt(1 - share ** 2) * high + share * plate
    slow = COAST_GAPS * np.clip(1 - speed / COAST_BELOW, 0, 1)
    coasting = up_bite ** slow * (1 + slow)
    sound = gain_of(rasp_db) * ((bright + low) * coasting + bench)
    sound = sound + gain_of(tones_db) * stroke_tones(tones, turns, speed, t)
    sound = sound + broad * coloured(knocked, SCRAPE_SPECTRUM)
    since = np.clip((t - t[0]) / (fades[0] + 1e-9), 0, 1)
    until = np.clip((t[-1] - t) / (fades[1] + 1e-9), 0, 1)
    return t[0], sound * np.sin(since * np.pi / 2) * np.sin(until * np.pi / 2)


def scene():
    """Saw and workshop in the middle, wind at the ports."""
    middle = pause() + hum()
    for stage in zip(STAGE_LEVELS, CRANK_STARTS, AIR_AMOUNTS, STAGE_FADES, RASP_SPECTRA, PLATE_RINGS,
                     LOW_PLATE_RINGS, PLATE_SHARES, MAIN_RING_PITCHES, STROKE_TONES):
        add(middle, *saw(*stage))
    return middle + wind()


def record(dry):
    """Bass cut of the microphone, rounded peaks, then the band limit of the recorder."""
    thinned = high_pass(dry, 3, 60)
    rounded = 2.2 * np.tanh(thinned / 2.2)
    band = signal.firwin(511, EDGE_HZ, window=("kaiser", 9), fs=SR)
    return signal.oaconvolve(rounded, band[None], "same")


dry = scene()
out = record(dry)
wav_out(out)
```